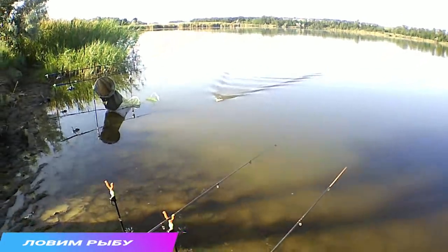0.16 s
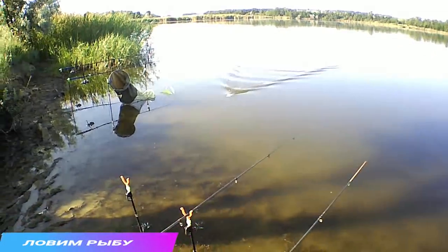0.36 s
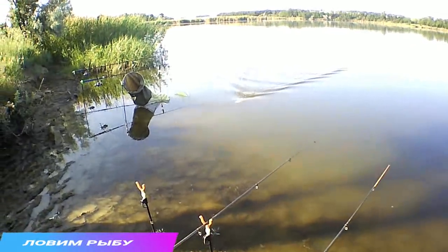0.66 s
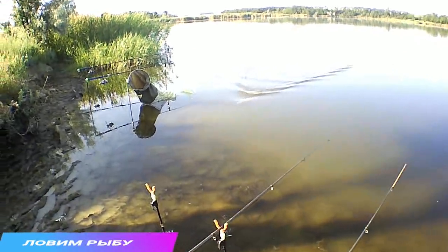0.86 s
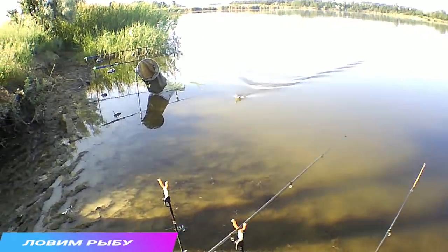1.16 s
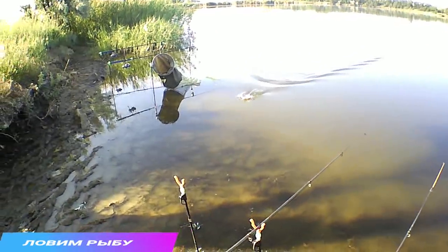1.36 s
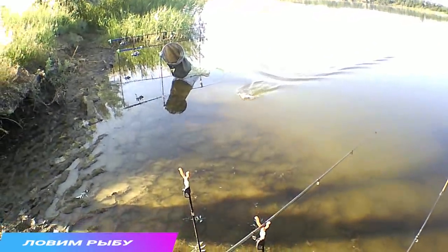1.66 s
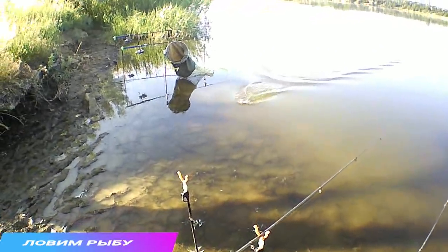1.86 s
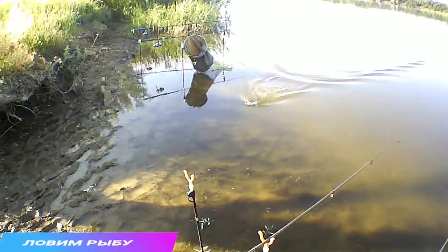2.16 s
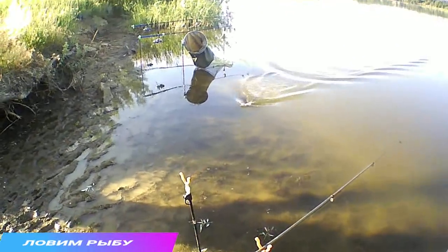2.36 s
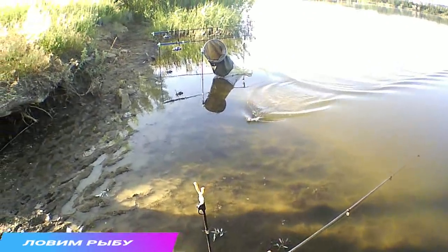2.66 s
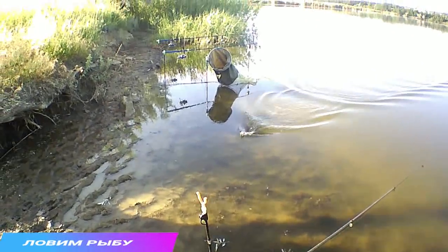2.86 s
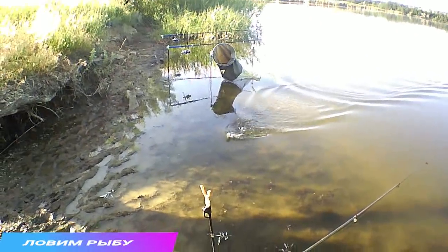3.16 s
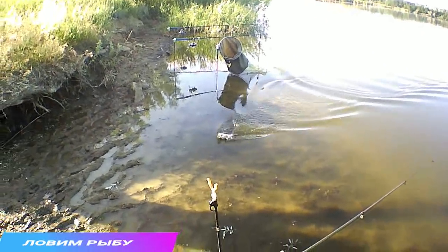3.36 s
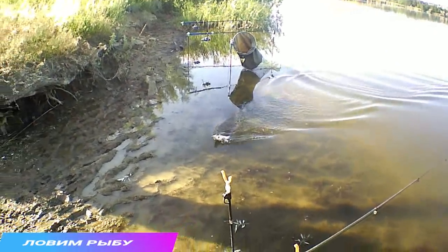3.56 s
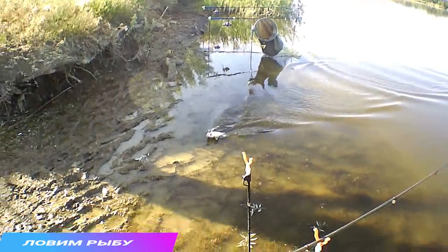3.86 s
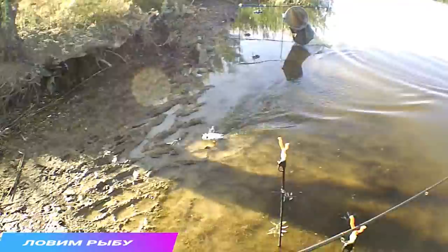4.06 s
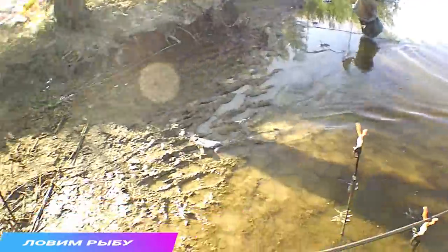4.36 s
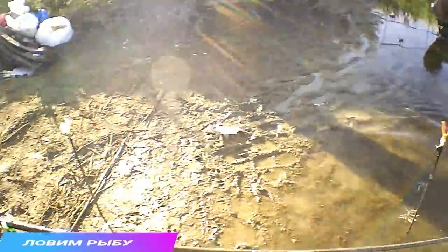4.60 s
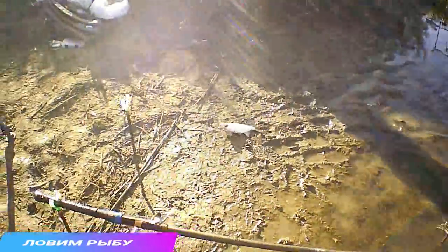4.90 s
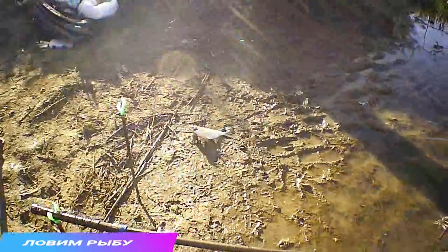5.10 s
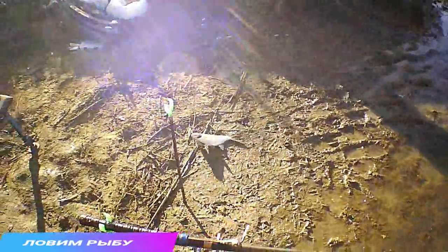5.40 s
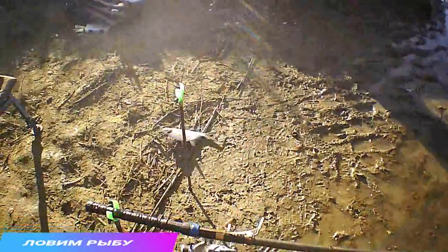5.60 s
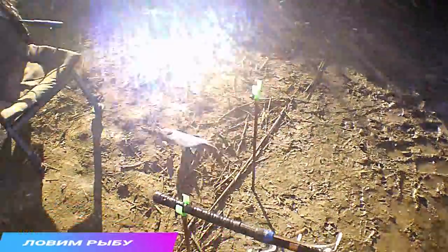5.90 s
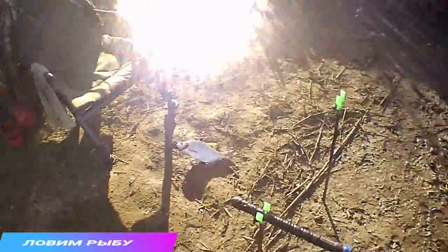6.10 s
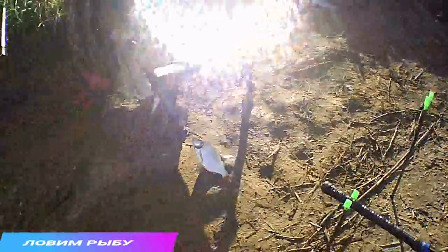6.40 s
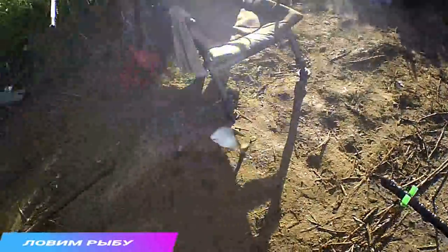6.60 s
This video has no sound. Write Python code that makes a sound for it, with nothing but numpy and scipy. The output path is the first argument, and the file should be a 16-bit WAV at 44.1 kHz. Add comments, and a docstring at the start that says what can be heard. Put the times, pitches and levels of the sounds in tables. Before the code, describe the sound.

Reel cranking, jingling bell, wet slaps and drips of a landed fish, over low rumble, thin high whine, frog croaks and bird twitter.

```python
"""A reel whirrs over a low rumble and a thin steady high whine, and a rough two-note cry opens an evening
on a lake shore. An angler reels in a small fish, which splashes and flaps on the mud; the bite bell tinkles.
Reel, air and rumble are shaped noise; frogs are pulses or throbbing bands, birds bent whistles, a toad one note.
Bell and slaps are damped rings with noise; drops and bubbles are short rising tones. The bank scatters it all."""
import sys
import numpy as np
from scipy import signal
from scipy.fft import rfft, irfft
from scipy.io import wavfile

SR = 44100
rng = np.random.default_rng(int(sys.argv[2]) if len(sys.argv) > 2 else 0)


def output_pcm(signal):
    """Save a mono or channel-first signal as 16-bit PCM at the path in sys.argv[1].

    Samples are clipped to [-1, 1] before scaling.
    """
    pcm = np.clip(np.atleast_2d(signal).T, -1, 1) * 32767
    wavfile.write(sys.argv[1], SR, np.round(pcm).astype(np.int16))


N = 297366
TIME_S = np.arange(N) / SR

# hiss of still air, spectrum shape: f/Hz, relative density/dB
AIR_SPECTRUM = [(100, -2.5), (200, -3), (400, -5), (800, -7), (1100, -9.5), (1450, -7.5), (2100, -14.5),
                (2600, -11), (3300, -18), (4400, -11), (6500, -19), (9500, -19.5), (10800, -22.5),
                (13500, -23.5), (15500, -30)]
# low rumble, spectrum shape: f/Hz, relative density/dB
RUMBLE_SPECTRUM = [(3, -8), (8, 0), (16, 6), (22, 2), (31, -7), (50, -7), (80, -14), (110, -17), (200, -22),
                   (300, -27), (600, -45), (2000, -90)]
# swell of the rumble: t/s, gain/dB
RUMBLE_SWELL = [(0, 1.5), (.6, -1.5), (1.9, 0), (2.8, -3.5), (4.2, -4), (5.0, 1), (6.1, 0), (6.74, 0)]
AIR_DB, RUMBLE_DB = -61, -47.5  # before slow level changes
# low drone and faint high hiss bands: f/Hz, width/Hz, level/dB
DRONE_AND_HIGH_BANDS = [(24, 6, -58), (49, 5, -59), (70, 12, -61), (8705, 70, -85), (9560, 600, -82),
                        (12306, 60, -91)]
# thin high whine, the close pair beats into a trill: mean f/Hz, level/dB
THIN_TONES = [(9555, -81.5), (9579, -82.5), (13657, -91), (15032, -96)]
# crank of the reel: t/s, whirr f/Hz, relative whirr level/dB, relative line hiss level/dB
CRANK = [(0, 1205, -62, -67), (.15, 1210, -58.5, -64.5), (.5, 1255, -54.5, -66.5), (.85, 1440, -54, -65.5),
         (1.119, 1664, -72, -65.5), (1.65, 1760, -60.5, -66.5), (2.05, 1570, -66.5, -70.5),
         (2.27, 1386, -58, -70), (2.6, 1279, -64, -84), (2.849, 1257, -55, -72.5), (3.2, 1240, -56, -74),
         (3.6, 1320, -53, -74.5), (3.74, 1310, -71.5, -90), (4.0, 1500, -79, -78), (4.11, 1575, -46.5, -64),
         (4.2, 1650, -59.5, -65.5), (4.422, 1660, -74.5, -69.5), (4.65, 1625, -98.5, -99)]
# resonances of the reel body: f/Hz, width/Hz, relative level/dB
REEL_BODY = [(904.8, 382, -3.5), (1767.8, 480, 2), (2750, 420, -5.5), (4065, 520, -1), (5373, 3720, -0.5)]
# how hard the fish stirs water and mud: t/s, patter level/dB
STIR = [(0, -66.5), (1.7, -62.5), (3.4, -66.5), (3.85, -62.5), (4.45, -60), (4.72, -77.5), (5.6, -64),
        (6.3, -72.5), (6.74, -68)]
# near frog croaks, and short rough onsets of the opening cries: t/s, length/s, pulses/count, relative level/dB
CROAKS_AND_ONSETS = [(.008, .021, 1, -48.5), (0.177, 0.021, 1, -48.5), (4.96, .09, 4, -46.5),
                     (5.106, .09, 3, -45), (5.333, .09, 4, -46.5), (5.484, 0.0824, 3, -46)]
CROAK_HZ = 1327.6  # nominal fundamental
PULSE_SPACING, PULSE_DUTY = 0.78, 0.91  # spacing under 1: pulses crowd towards the end
# throbbing rasps, far frogs and a blur over the opening cry: t/s, length/s, level/dB
THROBBING_RASPS = [(.015, 0.054, -57.5), (0.484, 0.061, -65), (0.724, 0.07, -63), (2.275, 0.15, -80),
                   (2.546, 0.094, -72), (2.881, 0.072, -67), (3.136, 0.067, -73), (3.38, 0.117, -85),
                   (5.758, 0.063, -64), (6.429, .15, -65), (6.648, 0.082, -60.5)]
# two-note cries of a water bird: t/s, length/s, relative level/dB
CRIES = [(0.026, 0.065, -52), (.204, 0.038, -58)]
# the two notes of a cry: start f/Hz, middle f/Hz, end f/Hz
CRY_CONTOURS = [(2006, 2120, 2120), (3047, 3010, 2900)]
# thin level whistles of a second bird: t/s, length/s, relative level/dB
WHISTLES = [(.65, 0.066, -56.5), (0.992, 0.206, -61.5), (3.61, 0.0622, -60.5), (4.822, 0.402, -67)]
# whistle contour: start f/Hz, middle f/Hz, end f/Hz
WHISTLE_CONTOUR = (4280, 4080, 4170)
# short falling chips: t/s, relative level/dB
CHIPS = [(1.264, -63), (1.305, -61), (1.391, -63), (1.574, -57), (1.85, -56.5), (2.181, -61)]
CHIP_S, CHIP_CONTOUR_HZ = 0.02415, (2887.5, 2611, 2270)  # start, middle, end
# far toad: t/s, peak level/dB
HOOTS = [(.2, -68), (1.48, -64), (2.63, -65), (3.82, -65), (6.45, -70)]
HOOT_HZ, HOOT_S = 538, .24
# flaps of the fish and knocks of the tackle: t/s, relative level/dB, centre f/Hz, relative spray/dB
SLAPS = [(0.2022, -35.5, 1940, -10), (.212, -39.5, 2140, -23.5), (1.613, -41, 1783, -22.5),
         (1.65, -46, 1740, -6.5), (1.672, -40, 1686, -24.5), (1.704, -33, 3240, -35.5),
         (1.7134, -30, 3570, -34.5), (1.829, -37, 3940, -28), (4.356, -45.5, 2390, -18),
         (4.492, -48, 1632, -10), (4.529, -37, 1518, -16.5), (4.9832, -34, 2900, -10),
         (5.3, -51, 1040, -15), (5.688, -46, 3610, -5), (5.745, -34.5, 1681, -18), (5.757, -32, 4100, -4.5),
         (5.809, -42, 2300, -16), (5.93, -36, 1598, -28), (5.965, -36.5, 4100, -6),
         (6.052, -43.5, 1434, -8.5), (6.196, -33, 1341, -16), (6.61, -39, 1330, -8.5)]
SLAP_CYCLES = 33.2  # centre-pitch cycles until the noise of a slap is 60 dB down
# wet splashes in the shallows and on the mud: t/s, relative level/dB
SPLASHES = [(4.264, -51), (4.42, -49), (4.555, -59), (5.898, -51), (5.969, -59), (6.425, -53.5)]
SPLASH_HZ, SPLASH_T60_S, SPLASH_SPRAY_DB = 1458.6, 0.056, -3
# dull bumps of the rod: t/s, level before attack and decay/dB
BUMPS = [(0.203, -43), (1.021, -45.5)]
# firm strikes of the bite bell: t/s, relative level/dB, share on the higher half of the shell/0-1
BELL_STRIKES = [(.224, -47.5, .05), (.33, -50.5, .95), (0.447, -54, 0.75), (.525, -46.5, 0.28),
                (.943, -46.5, 0.13), (1.34, -45.5, .25), (1.428, -47, 0.3), (1.446, -47.5, .65),
                (1.613, -44.5, 0.4), (1.665, -44, 0.93), (1.808, -46.5, .2), (1.848, -43, .7),
                (2.017, -46, .2), (2.073, -51.5, .05), (2.228, -42.5, .15), (2.305, -50.5, 0.62),
                (2.455, -49, 0.37), (2.481, -42, .35), (2.525, -46.5, 0.73), (2.587, -46, 0.01),
                (2.717, -47.5, .05), (3.29, -46.5, .05), (3.328, -47.5, 0), (3.394, -47.5, .1),
                (3.534, -44.5, 0.79), (3.634, -53, .85), (3.74, -48, 0.23), (3.759, -44, 0.1),
                (3.832, -45.5, 1), (3.955, -36, .7), (4.18, -45.5, .05), (4.215, -50.5, 0.22),
                (4.36, -45, 0), (4.385, -44, .35), (4.455, -45.5, 0.1), (4.577, -45.5, 0.4),
                (4.908, -47, .15), (5.167, -45, 0.41), (5.245, -48, 0.09), (5.275, -47, .35),
                (5.339, -47, 0.42), (5.401, -51, .05), (5.434, -46.5, 0.36), (5.483, -50, 0.5),
                (5.589, -42.5, .05), (5.656, -43, 0.4), (5.763, -48.5, .2), (5.798, -48, 0.1),
                (5.862, -39, 0.38), (6.005, -41, 0.27), (6.258, -52, 0.22), (6.316, -51, .75),
                (6.387, -37, 0.38), (6.426, -48.5, 0.63), (6.462, -36, .2), (6.583, -46, 0.7),
                (6.64, -46.5, 0.25)]
# bell modes: nominal f/Hz, relative level/dB, t60/s, share driven with the upper half/0-1
BELL_MODES = [(4752, .5, .075, 0), (4905, .5, .145, 1), (9555, -27, .1, .7), (12290, -17, .08, .7)]
REBOUND_CHANCE, REBOUND_MEAN_S, REBOUND_DB = .35, .028, -51.5
# drops and wet squelches: t/s, starting f/Hz, relative level/dB
DROPS = [(1.773, 790, -48.5), (3.645, 1070, -53.5), (3.735, 1080, -55.5), (3.798, 1417, -50.5),
         (3.841, 1020, -55.5), (3.981, 1906, -52), (4.572, 1572, -51), (5.482, 800, -53.5),
         (5.848, 1172, -52.5), (5.872, 1587, -39.5), (5.884, 959, -52), (5.957, 1812, -45.5)]
DROP_S, DROP_RISE = .017, 0.19  # rise as a share of the starting pitch
# notes of the twittering bird: t from closing arch/s, length/s, start f/Hz, middle f/Hz, end f/Hz,
# relative level/dB, level per effort/(dB/dB)
PHRASE_NOTES = [(-.18, 0.056, 5550, 6914, 5280, -56.5, 0.45),
                (-.089, 0.0395, 5950, 5590, 5944, -55.5, 1.09), (-.05, 0.052, 6270, 5246, 5873, -48, 1.18),
                (0, .052, 5800, 6500, 4070, -60, -0.23), (.002, .046, 3750, 5165, 4330, -52, 0.27)]
# its phrases: t of closing arch/s, effort/dB, opening notes left out/count
PHRASES = [(4.845, -11.5, 2), (4.997, -5.5, 2), (5.605, 4.5, 0), (6.108, 2, 0), (6.559, -0.5, 0)]
EDGE_HZ, OFFSET = 15750, -.036  # band limit; steady offset, full scale 1


def gain_of(db):
    """Amplitude ratio of a level in dB."""
    return 10 ** (np.asarray(db) / 20)


def evened(x):
    """Scale to rms 1."""
    return x / np.sqrt(np.mean(x ** 2) + 1e-20)


def add(mix, start_s, sound):
    """Mix a sound in at its start time, cut at the end."""
    part = mix[max(round(start_s * SR), 0):][:len(sound)]
    part += sound[:len(part)]


def clock(length_s):
    """Sample times in s."""
    return np.arange(int(length_s * SR)) / SR


def phase(hz):
    """Phase in radians, the running sum of frequency."""
    return 2 * np.pi * np.cumsum(hz) / SR


def noise(spectrum):
    """Noise of rms 1, its spectrum interpolated over log frequency."""
    point_hz, point_db = np.transpose(spectrum)
    hz = np.fft.rfftfreq(N, 1 / SR)
    shape_db = np.interp(np.log(hz + 1), np.log(point_hz + 1), point_db)
    white = rfft(rng.standard_normal(N))
    return evened(irfft(white * gain_of(shape_db), N))


def band(hz, width_hz, size, order=1):
    """Noise of rms 1 in a fixed or moving resonance; a higher order has steeper skirts."""
    offset_hz = np.fft.fftfreq(size, 1 / SR)
    shape = 1 + (2 * offset_hz / width_hz) ** (2 * order)
    white = rng.standard_normal(size) + 1j * rng.standard_normal(size)
    slow = np.fft.ifft(np.fft.fft(white) / shape)
    carrier = np.exp(1j * phase(hz * np.ones(size)))
    return evened((slow * carrier).real)


def wander(width_hz, size):
    """Slow random motion of rms 1."""
    return band(0, width_hz, size)


def background():
    """Shaped noise for air and rumble, noise bands for drone and high hiss, wavering sines for the whine."""
    air = gain_of(AIR_DB + .5 * wander(10, N)) * noise(AIR_SPECTRUM)
    swell_db = np.interp(TIME_S, *np.transpose(RUMBLE_SWELL))
    out = air + gain_of(RUMBLE_DB + swell_db) * noise(RUMBLE_SPECTRUM)
    for hz, db in THIN_TONES:
        out += gain_of(db) * evened(np.sin(phase(hz + 1.8 * wander(8, N))))
    for hz, width_hz, db in DRONE_AND_HIGH_BANDS:
        out += gain_of(db) * band(hz, width_hz, N)
    return out


def reel(whirr_width_hz=300, core_width_hz=130, core_share=0.48, whirr_db=-1.0, line_db=7.0):
    """A fuzzy whirr with a narrow core follows the crank; gear teeth and line rasp through the reel's body."""
    s, *controls = np.transpose(CRANK)
    pitch_hz, load_db, hiss_db = (np.interp(TIME_S, s, control) for control in controls)
    core = band(pitch_hz, core_width_hz, N, order=2)
    fuzz = band(pitch_hz, whirr_width_hz, N)
    whirr = evened(core_share * core + (1 - core_share) * fuzz)
    flutter_db = 1.2 * wander(70, N)
    body = np.zeros(N)
    for hz, width_hz, db in REEL_BODY:
        body += gain_of(db + 3.2 * wander(27, N)) * band(hz, width_hz, N)
    rasp = evened(body) * gain_of(hiss_db + line_db + wander(190, N))
    return whirr * gain_of(load_db + whirr_db + flutter_db) + rasp


def patter(count=24, per_s=260, cycles=6, spread_db=3):
    """Tiny bubbles and mud ticks, as loud as the fish is lively; the small, high ones are weaker."""
    out, t = np.zeros(N), clock(0.026)
    for hz in np.geomspace(1150, 3400, count):
        hits = rng.random(N) < per_s / count / SR
        pops = hits * gain_of(spread_db * np.minimum(rng.exponential(1, N), 3))
        envelope = np.exp(-t * hz / cycles) * (1 - np.exp(-t * hz / 2))
        bubble = np.sin(2 * np.pi * hz * t * (1 + 2 * t)) * envelope
        out += signal.oaconvolve(pops, bubble)[:N] / np.sqrt(hz)
    return evened(out) * gain_of(np.interp(TIME_S, *np.transpose(STIR)))


def rough_pulse(length_s, sag=0.068, fundamental_db=-8, catch_db=0, catch_hz=1740, scatter=.012):
    """A rough catch, then a sagging pitch; as in a frog's vocal sacs the second harmonic is favoured."""
    rasp_db, jitter, shimmer_db = -13, .022, 2
    t = clock(length_s)
    u, size = t / length_s, len(t)
    bend = 1 + scatter * rng.standard_normal() + sag * (.5 - u) + jitter * wander(450, size)
    turn = phase(CROAK_HZ * bend)
    tone = np.sin(2 * turn) + gain_of(fundamental_db) * np.sin(turn)
    tone = tone * np.sin(np.pi * u) * gain_of(shimmer_db * wander(280, size))
    catch = 1.123 * np.sin(2 * np.pi * catch_hz * t) + band(2005.7, 1800, size, order=2)
    catch = gain_of(catch_db) * np.exp(-t / 0.007) * catch
    rasp = gain_of(rasp_db) * band(2650, 1010, size)
    return (tone + catch + rasp) * signal.windows.tukey(size, .3)


def croaks_and_onsets(swell_db=3, level_db=-1.97):
    """A frog croak is a quickening run of pulses, loudest in the middle; a cry's rough onset is one pulse."""
    out = np.zeros(N)
    for s, length_s, pulses, db in CROAKS_AND_ONSETS:
        edges = np.linspace(0, 1, round(pulses) + 1) ** PULSE_SPACING
        for a, b in zip(edges, edges[1:]):
            arch = np.sin(np.pi * (a + b) / 2)
            pulse = rough_pulse((b - a) * length_s * PULSE_DUTY)
            add(out, s + a * length_s, gain_of(db + level_db + swell_db * arch) * pulse)
    return out


def throbbing_rasps(hz=2600, width_hz=450, rate_hz=45, depth=0.34):
    """A throbbing noise band: far frogs blurred by distance, and a blur over the opening cry."""
    out = np.zeros(N)
    for s, length_s, db in THROBBING_RASPS:
        t = clock(length_s)
        throb = 1 - depth * np.cos(2 * np.pi * rate_hz * t)
        rasp = throb * band(hz, width_hz, len(t)) * signal.windows.tukey(len(t), .5)
        add(out, s, gain_of(db) * rasp)
    return out


def note(length_s, contour_hz, waver=.01, flutter_db=3, lean=1.3):
    """A fluttering whistle bends along a parabola through start, middle and end pitch."""
    start, middle, end = contour_hz
    u = clock(length_s) / length_s
    bend = u ** lean if middle > max(start, end) else u  # an arch climbs slowly and drops fast
    hz = np.polyval(np.polyfit([0, .5, 1], contour_hz, 2), bend)
    whistle = np.sin(phase(hz * (1 + waver * wander(418, len(u)))))
    flutter = evened(gain_of(flutter_db * wander(270, len(u))))
    return whistle * flutter * signal.windows.tukey(len(u), .25)


def far_birds(level_db=1.0):
    """Cries, whistles and chips along the shore, each kind with one pitch contour per note."""
    out = np.zeros(N)
    for s, length_s, db in CRIES:
        add(out, s, gain_of(db) * sum(note(length_s, contour) for contour in CRY_CONTOURS))
    for s, length_s, db in WHISTLES:
        add(out, s, gain_of(db) * note(length_s, WHISTLE_CONTOUR))
    for s, db in CHIPS:
        add(out, s, gain_of(db) * note(CHIP_S, CHIP_CONTOUR_HZ))
    return gain_of(level_db) * out


def toad():
    """Soft-edged hoots on one pure note."""
    out, t = np.zeros(N), clock(HOOT_S)
    hoot = np.sin(2 * np.pi * HOOT_HZ * t) * signal.windows.tukey(len(t), .6)
    for s, db in HOOTS:
        add(out, s, gain_of(db) * hoot)
    return out


def slap(hz, t60_s, spray_db, ring_db=2, smack_db=-4, ring_share=0.61):
    """A hollow, quickly damped ring with a noisy smack and a fine spray."""
    t = clock(0.13)
    ring_decay_db = -60 * t / (t60_s * ring_share)
    ring = gain_of(ring_db + ring_decay_db) * np.sin(2 * np.pi * hz * t)
    smack = gain_of(smack_db) * band(hz, 1.05 * hz, len(t))
    spray = 1.054 * band(5000, 5100, len(t)) + 0.26 * band(12800, 3000, len(t))
    wet = (smack + gain_of(spray_db) * spray) * gain_of(-60 * t / t60_s)
    return (ring + wet) * (1 - np.exp(-t / 0.0015))


def slaps(slap_db=5, splash_db=5):
    """The higher a slap, the sooner it dies; splashes share one pitch, decay and amount of spray."""
    out = np.zeros(N)
    for s, db, hz, spray_db in SLAPS:
        add(out, s, gain_of(db + slap_db) * slap(hz, SLAP_CYCLES / hz, spray_db))
    for s, db in SPLASHES:
        add(out, s, gain_of(db + splash_db) * slap(SPLASH_HZ, SPLASH_T60_S, SPLASH_SPRAY_DB))
    return out


def bumps(t60_s=.06, hz=130, width_hz=380):
    """Low thuds carried through the angler's body: decaying noise bands."""
    out, t = np.zeros(N), clock(0.43)
    attack = 1 - np.exp(-t / 0.00135)
    for s, db in BUMPS:
        add(out, s, gain_of(db - 60 * t / t60_s) * band(hz, width_hz, len(t)) * attack)
    return out


def strike(upper, tick_db=-6, tick_t60_s=0.053, rattle_db=0.5):
    """A loose pellet strikes and rattles in a slotted shell whose two halves ring at close pitches."""
    t, upper = clock(0.55), np.clip(upper, 0, 1)
    attack = 1 - np.exp(-t / .0016)
    load = 1 + .003 * rng.standard_normal()  # shifts all modes together
    ring = np.zeros(len(t))
    for hz, db, t60_s, share in BELL_MODES:
        drive = (1 - share) * (1 - upper) + share * upper
        tone = np.sin(2 * np.pi * (hz * load * t + rng.random()))
        ring += drive * gain_of(db - 60 * t / t60_s) * tone
    rattle = gain_of(np.minimum(rattle_db * wander(250, len(t)), 1))
    tick = gain_of(tick_db - 60 * t / tick_t60_s) * band(4680, 280, len(t))
    return (ring * rattle + tick) * attack


def bell():
    """Each shake of the rod gives a firm strike; at times the pellet falls back in a light rebound."""
    out = np.zeros(N)
    for s, db, upper in BELL_STRIKES:
        chance, delay, place = rng.random(3)
        add(out, s, gain_of(db) * strike(upper))
        if chance < REBOUND_CHANCE:
            add(out, s + REBOUND_MEAN_S * (.5 + delay), gain_of(REBOUND_DB) * strike(place ** 2))
    return out


def drops(level_db=2):
    """Small air pockets ring briefly and rise in pitch."""
    out, t = np.zeros(N), clock(DROP_S)
    u = t / DROP_S
    envelope = (1 - np.exp(-t / 0.00031)) * (1 - u ** 2)
    for s, hz, db in DROPS:
        add(out, s, gain_of(db + level_db) * np.sin(phase(hz * (1 + DROP_RISE * u))) * envelope)
    return out


def twitter(level_db=-1.5):
    """A repeated phrase: a high arch, two dips, then an arch on both sides of the syrinx at once."""
    out = np.zeros(N)
    for s, effort_db, skipped in PHRASES:
        for offset_s, length_s, *contour_hz, db, follow in PHRASE_NOTES[round(skipped):]:
            note_db = level_db + db + follow * effort_db
            add(out, s + offset_s, gain_of(note_db) * note(length_s, contour_hz))
    return out


def shore(x, t60_s=0.17):
    """Thin scatter from the reeds and the bank: sparse, decaying random echoes."""
    t = clock(.6)
    taps = rng.standard_normal(len(t)) * (rng.random(len(t)) < .05)
    taps = taps * gain_of(-60 * t / t60_s) * (t > .004)
    return signal.fftconvolve(x, taps / np.linalg.norm(taps))[:N]


def scene():
    """Animals, tackle and fish, scattered by the shore, over background and reel."""
    animals = croaks_and_onsets() + throbbing_rasps() + twitter() + far_birds() + toad()
    near = bell() + drops() + slaps() + patter() + bumps()
    scatter = shore(gain_of(-10.5) * animals + gain_of(-13.0) * near)
    return (background() + reel() + animals + near + scatter)[None]


def record(dry):
    """Low-pass band limit, then a steady offset."""
    lowpass = signal.firwin(511, EDGE_HZ, window=("kaiser", 9), fs=SR)
    return OFFSET + signal.oaconvolve(dry, lowpass[None], "same")


dry = scene()
out = record(dry)
output_pcm(out)
```